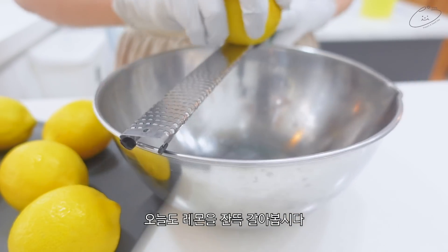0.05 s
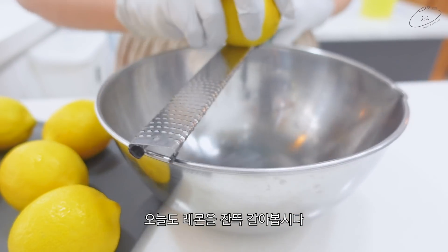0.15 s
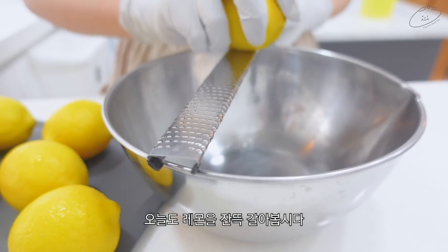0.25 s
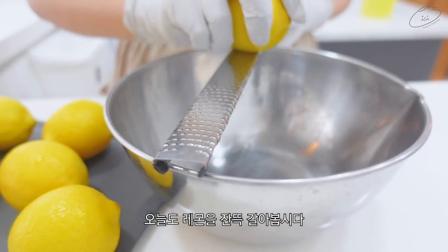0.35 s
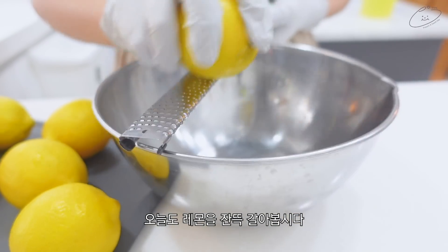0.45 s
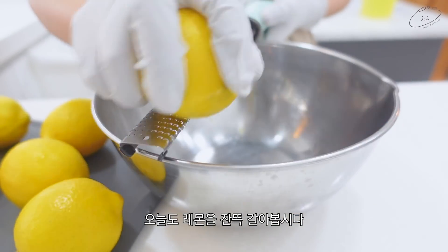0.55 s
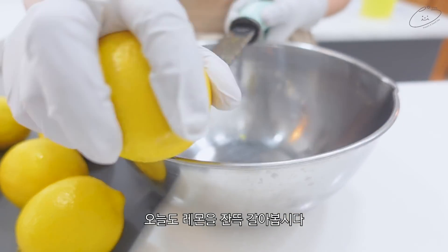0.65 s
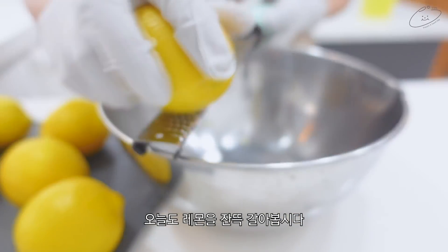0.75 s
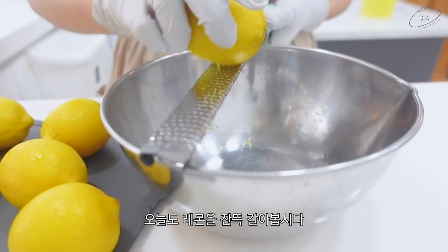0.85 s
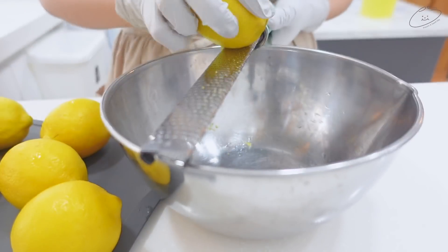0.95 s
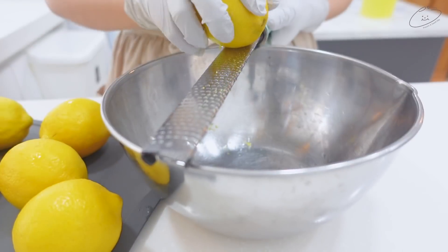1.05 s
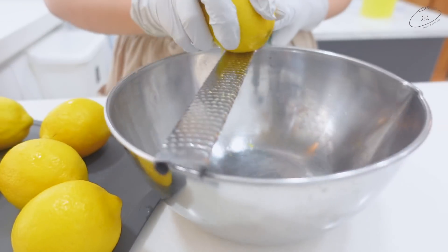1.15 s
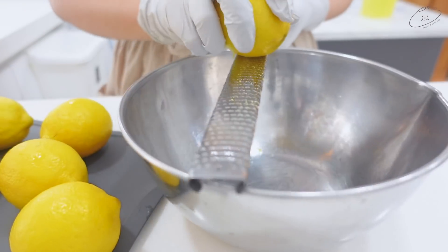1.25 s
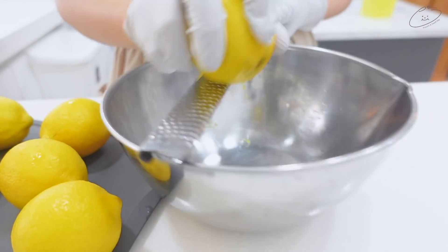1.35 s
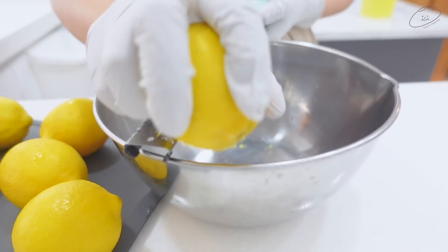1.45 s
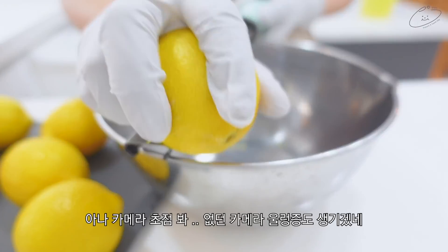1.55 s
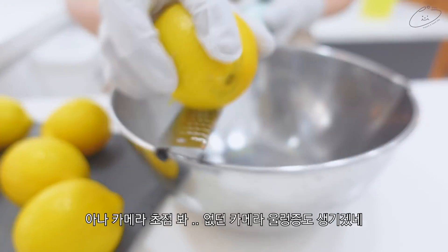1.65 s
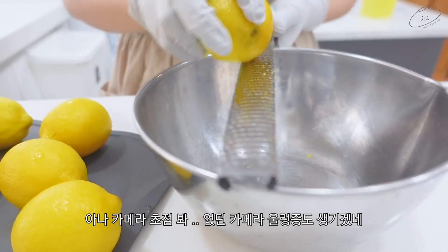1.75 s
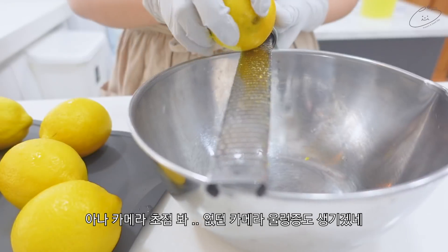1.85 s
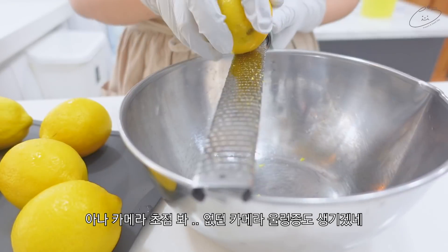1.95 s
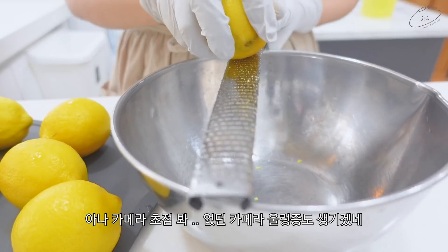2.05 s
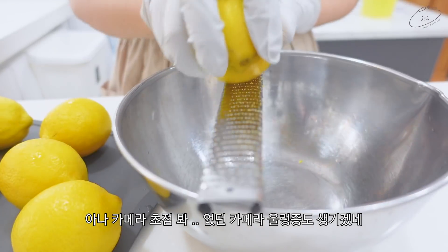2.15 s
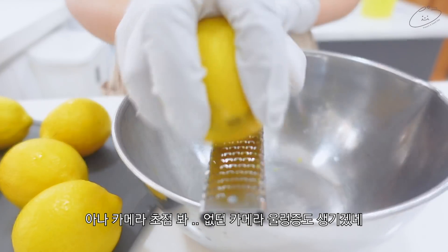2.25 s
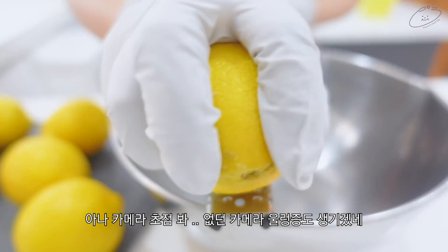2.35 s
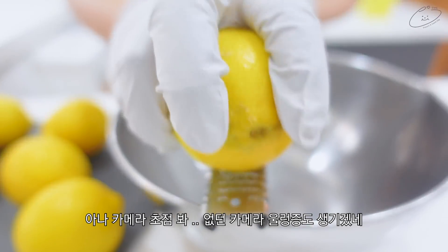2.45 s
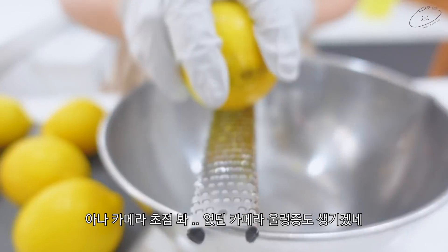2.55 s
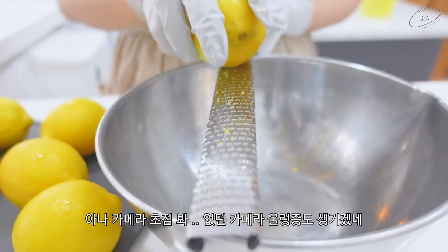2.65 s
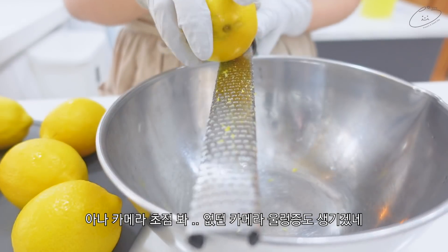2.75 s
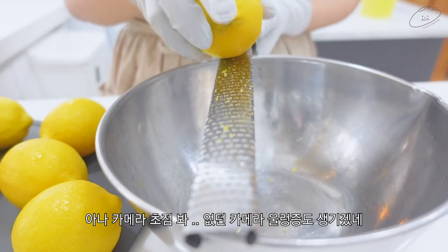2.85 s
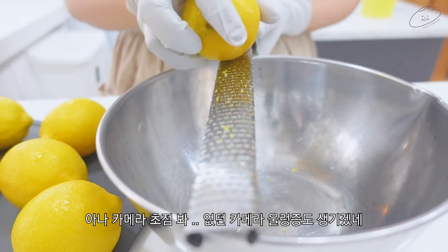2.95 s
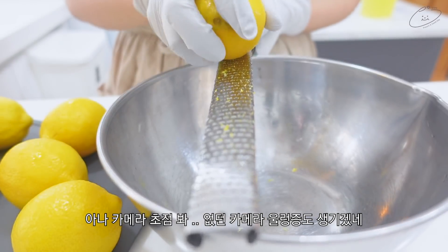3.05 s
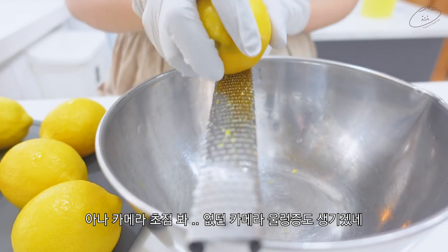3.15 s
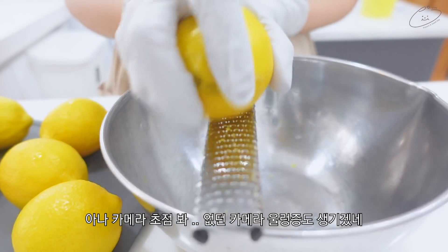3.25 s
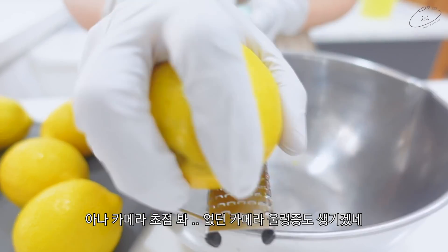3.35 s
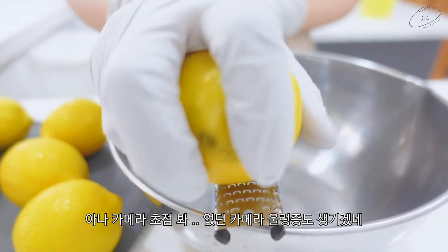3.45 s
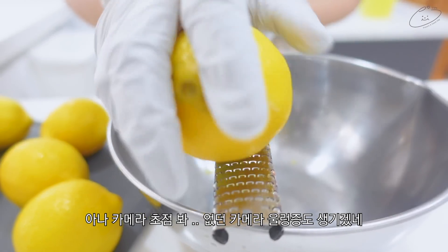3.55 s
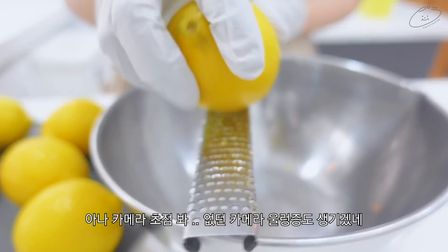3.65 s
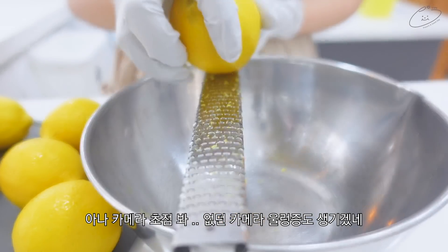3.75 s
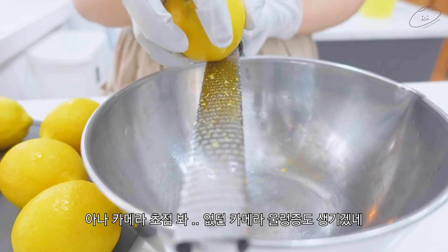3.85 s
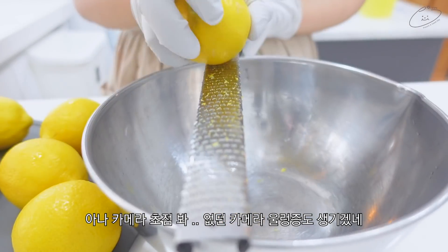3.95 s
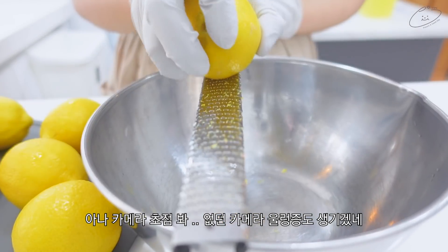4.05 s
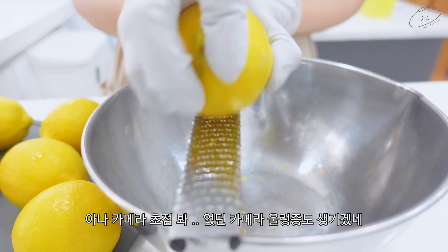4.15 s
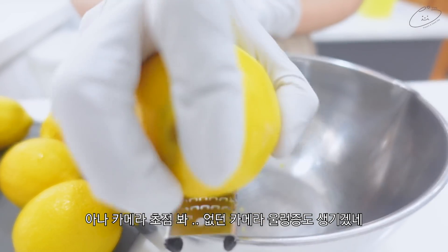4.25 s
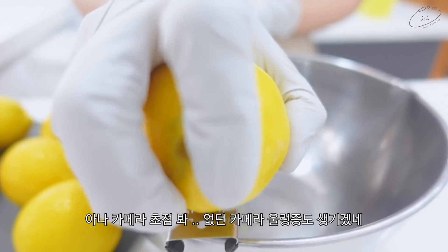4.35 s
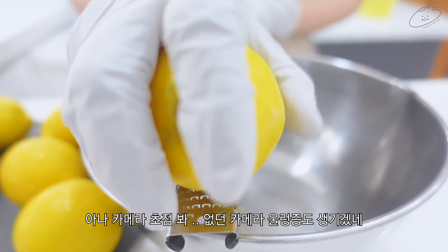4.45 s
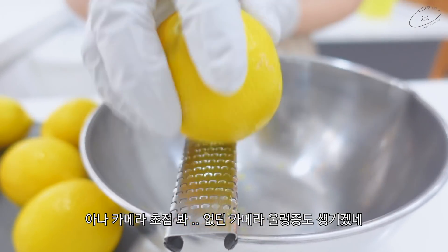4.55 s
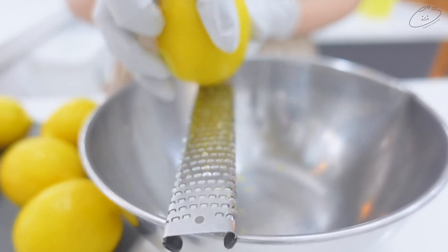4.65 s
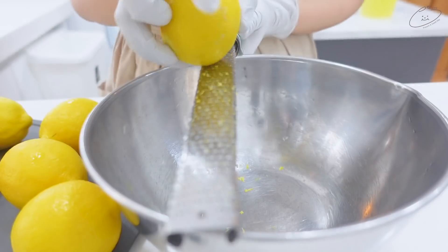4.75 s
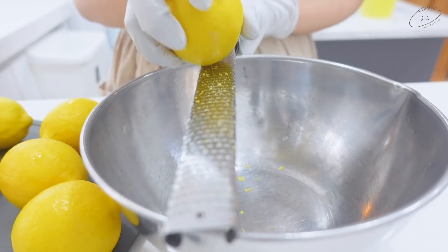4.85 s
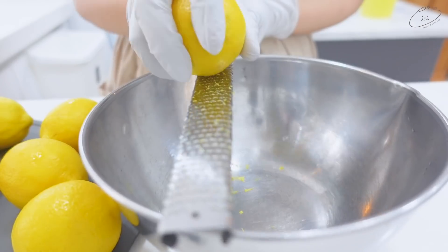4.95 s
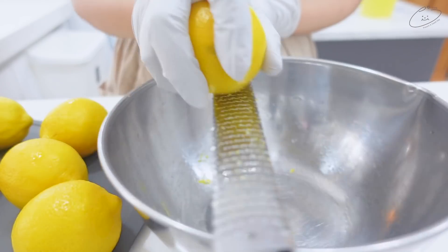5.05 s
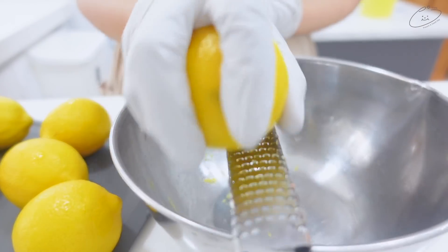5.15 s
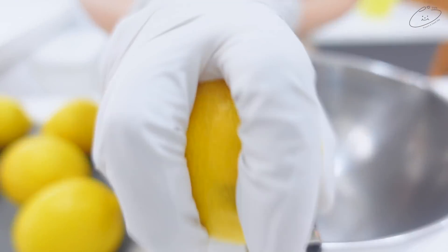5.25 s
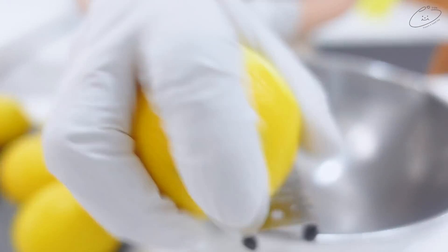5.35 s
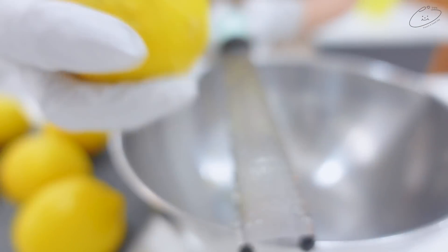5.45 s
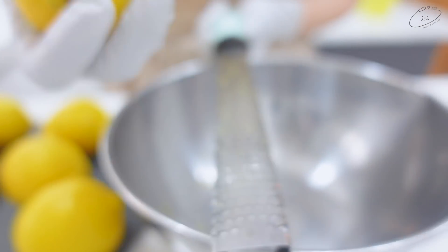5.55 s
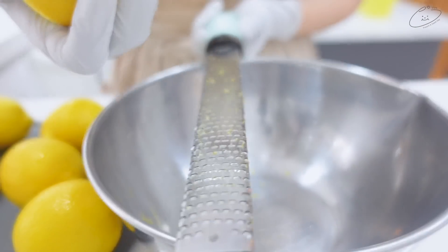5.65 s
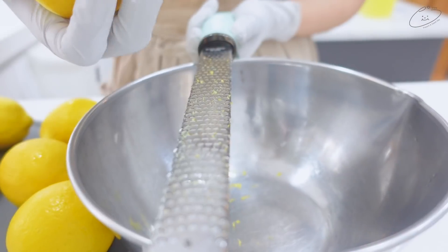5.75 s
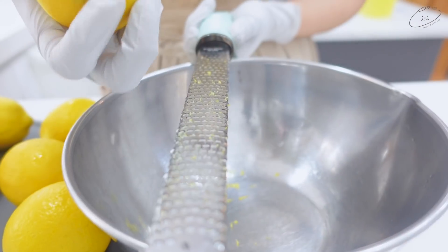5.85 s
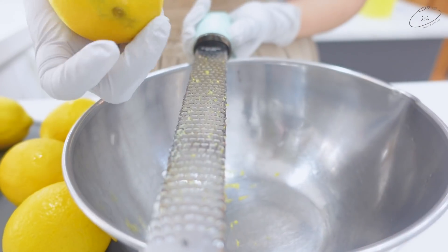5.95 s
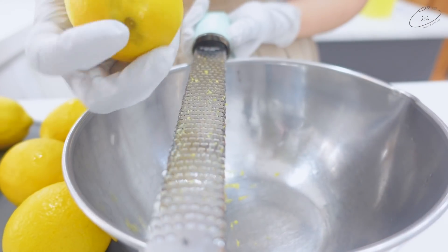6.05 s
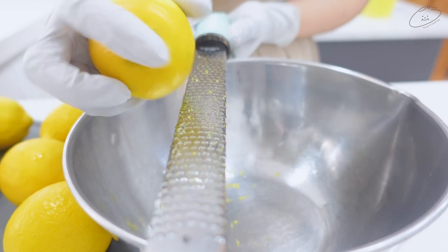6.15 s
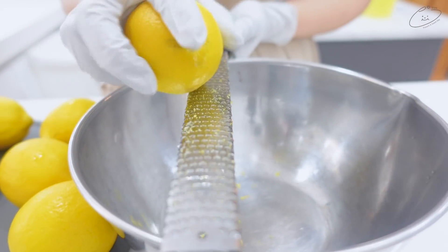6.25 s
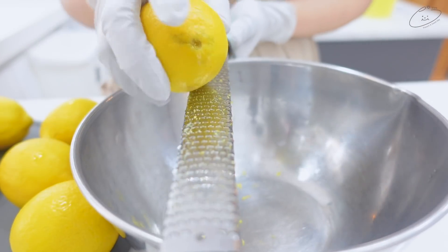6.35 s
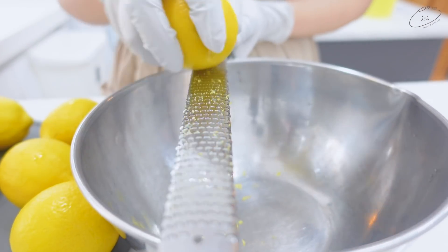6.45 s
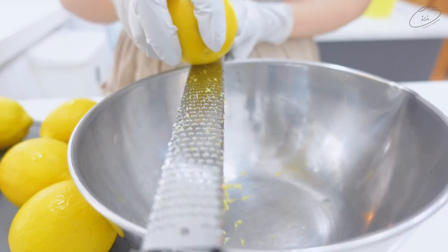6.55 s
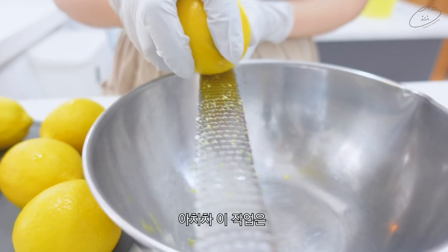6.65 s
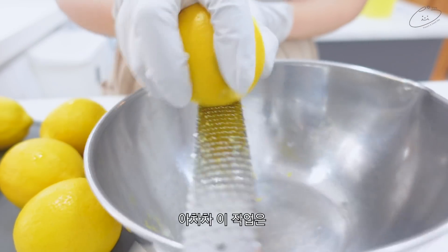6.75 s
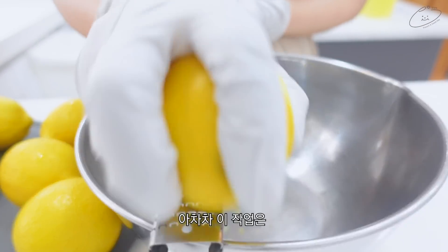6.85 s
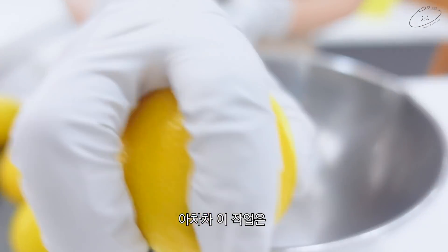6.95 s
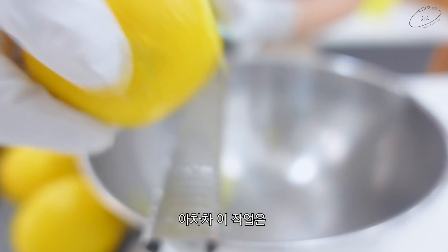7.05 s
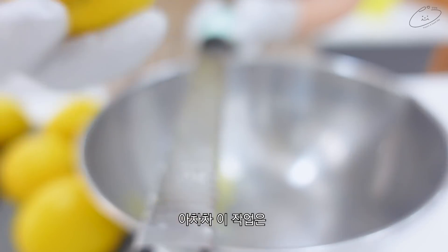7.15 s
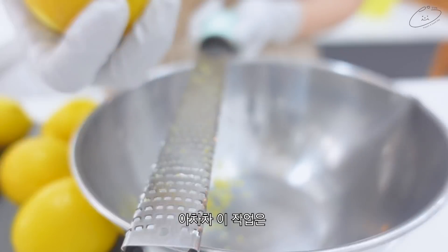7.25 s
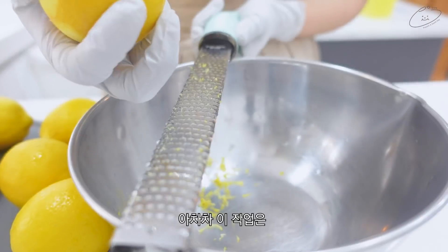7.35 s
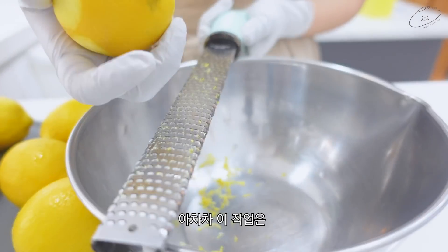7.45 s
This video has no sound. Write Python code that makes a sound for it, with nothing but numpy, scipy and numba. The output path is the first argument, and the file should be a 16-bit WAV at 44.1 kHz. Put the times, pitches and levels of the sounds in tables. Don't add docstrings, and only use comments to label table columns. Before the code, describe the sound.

Close, crisp rasping of citrus peel on a metal grater, separated by soft rustles and rim ticks over a bowl; faint low room rumble behind.

```python
import sys
import numpy as np
from scipy import signal
from scipy.fft import rfft, irfft
from scipy.io import wavfile
from scipy.ndimage import uniform_filter1d
from numba import njit

SR = 44100
rng = np.random.default_rng(int(sys.argv[2]) if len(sys.argv) > 2 else 0)


def field_ratio(decibels):
    return 10 ** (np.asarray(decibels, dtype=float) / 20)


def store_pcm(level_fs):
    pcm = np.round(np.clip(level_fs, -1, 1) * 32767).astype(np.int16)
    wavfile.write(sys.argv[1], SR, np.atleast_2d(pcm).T)


N = 330353

# (pitch [Hz], width [Hz], level [dB])
BLADE_MODES = [(1990, 120, -2), (3430, 1100, -4), (2997, 210, 1.5), (3870, 57, 8), (4440, 610, 9.5),
               (5220, 1350, 5.5), (1740, 560, -13.5), (2425, 72, -4)]
# (pitch [Hz], width [Hz], level [dB])
TEETH_MODES = [(6550, 250, 6.5), (6690, 170, 6), (7450, 1400, -6), (8250, 310, 11), (8900, 300, -3.5),
               (10230, 170, 3)]
# (centre [Hz], width [Hz], level [dB])
GLOVE_BRIGHT = [(6550, 3500, -0.5), (9280, 2800, 0.5), (11240, 5450, -1.5), (15400, 1600, -8)]
# (start [s], attack [s], hold [s], release [s], heaviest after the attack [s])
STROKES = [
    (0.429, 0.021, .24, 0.11, .0),
    (1.345, 0.022, 0.13, 0.14, 0),
    (2.125, 0.058, 0.21, 0.058, 0.012),
    (3.179, 0.046, 0.19, 0.13, 0.11),
    (4.071, 0.12, 0.13, 0.14, 0.038),
    (5.102, 0.077, 0.17, 0.074, 0.045),
    (6.747, 0.067, 0.14, 0.12, 0.065),
]


def level(x, db):
    return x * field_ratio(db) / np.sqrt(np.mean(x ** 2))


@njit
def svf(x, hz, width):
    y, band, low = np.empty(len(x)), 0., 0.
    for i in range(len(x)):
        g, k = np.tan(np.pi * hz[i] / SR), width / hz[i]
        v = (band + g * (x[i] - low)) / (1 + g * (g + k))
        band, low, y[i] = 2 * v - band, low + 2 * g * v, k * v
    return y


def band_twice(x, hz, width):
    centre = np.zeros(N) + hz
    return svf(svf(x, centre, 1. * width), centre, 1. * width)


def walk(rate):
    k = int(SR / rate)
    held = np.repeat(rng.standard_normal(4000)[:N // k + 1], k)
    return 1.3 * uniform_filter1d(uniform_filter1d(held, k), k)[:N]


def ring(x, modes, drift=0., vary_db=0., flip=-1, ratio=0.98, feed_db=()):
    x = np.atleast_2d(x)
    shares = field_ratio(np.transpose(modes)[2])
    feed_db = [*feed_db, *np.zeros(len(modes))]
    out = 0
    for k, (hz, width, _) in enumerate(modes):
        drive = x[k % len(x)] * field_ratio(feed_db[k] + vary_db * walk(25)) + 1e-18
        moving_hz = hz * ratio * (1 + drift * walk(6))
        out = out + flip ** k * shares[k] / np.sqrt(width) * svf(drive, moving_hz, 1. * width)
    return out / np.sqrt(np.pi / SR * np.sum(shares ** 2))


def curve(table):
    s, *columns = np.transpose(table)
    return [np.interp(np.arange(N) / SR, s, c) for c in columns]


def grit(scatter_db, catch_db, rate):
    uneven = np.minimum(rng.exponential(size=N), 4)
    sizes = field_ratio(scatter_db * uneven + catch_db * walk(rate))
    return level(rng.standard_normal(N) * sizes, 0)


def tone(table, wobble):
    first, last = table[0], table[-1]
    hz, db = curve([(first[0] - .05, first[1], -120), *table, (last[0] + .05, last[1], -120)])
    turn = 2 * np.pi * np.cumsum(hz * (1 + wobble * walk(68))) / SR
    return np.sqrt(2) * field_ratio(db) * np.sin(turn)


def milliseconds():
    return np.arange(N * 1000 // SR + 1)


def per_sample(slow):
    return np.interp(np.arange(N) / SR, np.arange(len(slow)) / 1000, slow)


def swells(peak_s, rise_s, fall_s, db):
    late = milliseconds() / 1000 - peak_s[:, None]
    fade_db = 17 * np.maximum(late / fall_s[:, None], -late / rise_s[:, None])
    return db[:, None] - fade_db


def kitchen():
    # (pitch [Hz], level [dB per Hz])
    colour = [(18, -57), (30, -27), (95, -1.5), (174, 5.5), (319, -13), (486, -26), (684, -15), (1910, -26),
              (4080, -32.5), (4420, -35), (6720, -34), (14800, -39.5), (16000, -39)]
    hz, db = np.transpose(colour)
    log_hz = np.log(np.fft.rfftfreq(N, 1 / SR) + 1)
    wide_db = np.interp(log_hz, np.log([200, 400, 4400, 8000]), [-22.5, -3.5, -7.5, -13.0])
    mid_db = np.interp(log_hz, np.log(hz), db)
    spectra = rfft(rng.standard_normal((2, N))) * field_ratio(mid_db + [0 * wide_db, wide_db])
    mid, side = irfft(spectra, N)
    breathing = field_ratio(0.22 * walk(0.35))
    return level((mid + side * np.array([[1], [-1]])) * breathing, -42.5)


def road():
    pass_s, width_s = 2.7, 2.3
    rumble = band_twice(rng.standard_normal(N), 160, 120)
    return level(rumble, -58) * np.exp(-((np.arange(N) / SR - pass_s) / width_s) ** 2)


def contact():
    # (tearing [dB], lost 0.1 s off the peak [dB],
    # hiss, bowl and table against tearing [dB, dB, dB])
    force = [(-28.5, -0.26, 0.26, -1, -3), (-25, 1, 2, 1, -7.5), (-28.5, -1.5, 1.6, 0.5, -9),
             (-27, 3, 3.5, 1.5, -10), (-25.5, 3.5, 3.2, 5, -8), (-23.5, 4.5, 1.5, -2, -7.5),
             (-22, 4, 2.5, 3.5, -8.5)]
    # (peak [s], rise [s], fall [s], hiss [dB],
    # bowl against hiss [dB])
    brushes = [(.07, 0.39, 0.52, -51.5, -2.5), (.24, 0.048, 0.053, -50.5, 1),
               (.285, 0.028, 0.026, -48.5, 6.5), (.8, 0.11, 0.23, -44, -3), (.905, 0.052, 0.33, -49, 0),
               (.945, 0.12, 0.039, -40.5, 4), (1.297, 0.51, 0.049, -52.5, 4.5), (1.68, 0.14, 0.13, -53, 2),
               (1.8, 0.23, 0.12, -39, 0.5), (1.956, 0.13, 0.24, -47, -2.5), (2.1, 0.067, .08, -54, 5),
               (2.514, 0.11, 0.053, -46, -1), (2.625, 0.11, 0.25, -39.5, 1),
               (2.725, 0.14, 0.038, -41.5, -4), (3.69, 0.063, 0.28, -41, -32),
               (3.775, 0.18, 0.12, -47.5, 3), (4.44, 0.13, 0.048, -63.5, 18.5),
               (4.674, 0.11, 0.28, -43, -1), (5.0, 0.75, .1, -44.5, -5), (5.085, 0.059, 0.045, -49.5, 10),
               (5.43, 0.15, 0.17, -49, -0.5), (5.557, 0.31, 0.13, -45, -11), (6.48, 0.39, 0.12, -45, -16),
               (6.55, 0.13, 0.075, -49, 3),
               (6.712, 0.044, 0.029, -36.5, 0.5),
        (6.911, 0.01, .007, -21, -4),
        (7.033, 0.053, 0.051, -56, 22),
    ]
    # (peak [s], rise [s], fall [s], hiss [dB])
    rustles = [(1.073, 0.38, 0.12, -45.5), (2.968, 0.59, 0.13, -44.5), (3.078, 0.056, 0.049, -43),
               (3.572, 0.065, 0.22, -40), (3.966, 0.2, 0.071, -43), (4.585, 0.22, 0.066, -41),
               (5.847, 0.065, 0.057, -50), (5.98, 0.16, 0.085, -49.5), (6.166, 0.088, 0.061, -45),
               (6.275, 0.052, .05, -46), (6.358, 0.068, 0.029, -44), (7.159, 0.095, 0.1, -41.5),
               (7.3, 0.068, 0.29, -50.5)]
    peak_shares = (1.01, 1.2, 1.6, 2.1)
    # (tearing, hiss, bowl, table) [dB]
    slowing_loss = (0.5, 5, 6, -12.5)
    # (tearing, hiss, bowl, table) [dB]
    rest_levels = (-111, -81, -82, -56)

    start, attack, hold, release, peak = np.transpose(STROKES)[:, :, None]
    tear_db, off_peak_db, *others_db = np.transpose(force)[:, :, None]
    age = milliseconds() / 1000 - start - attack
    stroke = tear_db - 18.5 * np.maximum(-age / attack, 0) ** 1.71
    stroke = stroke - 34 * np.maximum((age - hold) / release, 0)
    off = 10 * np.abs(np.clip(age, 0, hold) - peak)
    slowing = np.clip(age / hold, 0, 1) ** 4.3
    strokes = []
    for db, share, slow_db in zip([0, *others_db], peak_shares, slowing_loss):
        strokes.append(stroke + db - share * off_peak_db * off - slow_db * slowing)
    strokes[-1] = strokes[-1] - 5.5 * off ** 2

    glove_bowl_db = -11.5
    light = [*brushes, *[(*row, glove_bowl_db) for row in rustles]]
    *shape, bowl = np.transpose(light)
    touch, bowl = swells(*shape), bowl[:, None]
    touches = touch - 2 + 0.6 * bowl, touch, touch + bowl, touch + 0.92 * bowl - 7
    levels = []
    for a, b, rest in zip(strokes, touches, rest_levels):
        power = np.sum(field_ratio(2 * a), axis=0) + np.sum(field_ratio(2 * b), axis=0) + field_ratio(2 * rest)
        levels.append(per_sample(10 * np.log10(power)))
    return levels


def load():
    # (bowl pitch at start [ratio], at end [ratio], upper modes [dB], blade pitch [ratio])
    loads = [(1.054, 1.094, -10, 0.93), (1.004, 1.06, -6.5, 1.02), (1.01, 0.98, -6.5, 0.99),
             (0.94, 1, -2, 1.01), (1, 0.97, -7, .99), (1.106, 0.946, -5.5, 0.98), (0.97, 1.034, -9, 0.972)]
    rows = []
    for (s, attack, hold, _, _), (first, last, *rest) in zip(STROKES, loads):
        rows += [(s, first, *rest), (s + attack + hold, last, *rest)]
    return curve(rows)


def bearing():
    feeds = [(-2, 8, -5, -6, 0.5), (-2, 8, -1.8, -4, -3), (4.5, 8.5, -0.5, -7.5, 1.8),
             (6, -15, -6, -3, 2.5), (4.5, 8, 2.5, -2, 3.5), (6.5, 13.5, 1.5, -4, 1),
             (6.5, -3, 4.5, -2.5, 0)]
    # (first mode [dB], fourth mode [dB])
    travel = [(0, 0), (-3, -5), (6, 0), (6, -3), (9, -2), (4, -14), (13, -3)]
    rows = []
    for (s, attack, hold, _, _), feed, (first, fourth) in zip(STROKES, feeds, travel):
        change = np.array([first, 0, 0, fourth, 0])
        rows += [(s, *(feed - .5 * change)), (s + attack + hold, *(feed + .5 * change))]
    return curve(rows)


def grips():
    # (time [s], gain [dB])
    moments = [(0.466, -2.5), (0.499, 1), (0.526, 2), (0.535, 0), (0.559, -1.3), (0.601, -2), (0.618, 4.5),
               (0.637, 3.5), (0.654, 1.5), (0.673, 2), (0.688, 3), (0.699, -5), (1.402, 2.5), (1.429, 0),
               (1.478, 0), (1.516, 2), (2.221, 0), (2.25, 4), (2.338, 0), (2.392, 1), (2.411, 3),
               (3.212, -3.5), (3.228, -4), (3.285, 2), (3.313, 3), (3.339, -4), (4.211, 2.5), (4.355, -2.5),
               (5.132, -5.5), (5.169, 0.5), (5.191, 0), (5.198, -4), (5.337, -1), (6.896, 4), (6.913, 5.5),
               (6.922, -5), (6.944, -3), (6.982, 4)]
    s, db = np.transpose(moments)[:, :, None]
    width_ms = 5.3
    bumps = db * np.exp(-((milliseconds() - 1000 * s) / width_ms) ** 2)
    return per_sample(0.73 * np.sum(bumps, axis=0))


def rasp():
    # (pitch [Hz], width [Hz], level [dB])
    table_modes = [(284.7, 20, 0), (345, 36, 3), (426, 167, 0.5)]
    # (pitch [Hz], width [Hz], level [dB])
    bowl_modes = [(556, 77, -5), (638, 67, 0.5), (727, 125, -6)]
    # (pitch [Hz], width [Hz], level [dB])
    upper_modes = [(814, 290, -4), (1248, 86, -1.5), (1384, 110, 0)]
    # (centre [Hz], width [Hz], level [dB])
    glove_dark = [(2300, 5700, -0.58), (4760, 2600, 1.1)]

    tear_db, hiss_db, bowl_db, push_db = contact()
    pressed = np.clip((tear_db + 49.5) / 14, 0, 1)
    jitter_db = 0.49 * walk(40) + 0.75 * walk(220) + (1 - pressed) * 2.37 * walk(110)
    catches = field_ratio(grips() + jitter_db)
    out = ring(field_ratio(push_db) * grit(0.29, 2.5, 60), table_modes)

    shake = field_ratio(bowl_db - 1) * catches * grit(2.2, 0.93, 120)
    ratio, upper_db, blade_ratio = load()
    out += ring(field_ratio(-2.5 * pressed) * shake, bowl_modes, drift=0.0074, vary_db=1.5, ratio=ratio)
    out += ring(field_ratio(upper_db - 2 * (1 - pressed)) * shake, upper_modes, drift=0.0056, vary_db=0.5)

    tearing = tear_db, BLADE_MODES, glove_dark, .75, bearing()
    hissing = hiss_db, TEETH_MODES, GLOVE_BRIGHT, .3, ()
    for db, modes, rustle, share, feed_db in (tearing, hissing):
        steel = share * pressed
        force = field_ratio(db) * catches
        rows = [steel * force * grit(0.66, 1.5, 300) for _ in range(3)]
        out += ring(rows, modes, drift=0.0064, vary_db=2.0, ratio=blade_ratio, feed_db=feed_db)
        out += ring(np.sqrt(1 - steel ** 2) * force * grit(4.3, 0.26, 300), rustle, vary_db=0.23)
    return out


def snaps():
    # (time [s], level [dB], centre [Hz])
    clicks = [(0.011, -38.5, 3900), (0.158, -36, 4470), (0.885, -29, 5240), (0.9792, -41, 7500),
              (1.0001, -41, 4440), (1.104, -38, 8060), (1.1679, -39.5, 7950), (1.2186, -40, 4940),
              (2.0393, -45, 6790), (2.5052, -42, 6260), (2.796, -36, 9750), (2.84, -48, 5000),
              (2.922, -44, 6120), (3.56, -43, 6790), (3.6363, -32, 8820), (3.6564, -42, 4970),
              (3.6693, -39, 8330), (3.961, -39, 4270), (4.5735, -46, 6570), (5.0344, -41, 6700),
              (5.0494, -43, 6200), (5.573, -42, 9310), (5.6107, -42, 9450), (5.8417, -37, 7100),
              (5.995, -44, 12000), (6.572, -43, 3000), (6.487, -45, 8000), (5.103, -38, 6000),
              (5.072, -44, 5000), (6.1356, -41, 6350), (6.19, -52, 5880), (6.351, -33, 8000),
              (6.433, -50, 4720), (6.4579, -43, 5640), (6.556, -40, 7880), (6.894, -15, 3870),
              (7.003, -20.5, 9350), (7.163, -33, 12900)]
    out, centre, t = np.zeros(N), np.full(N, 8000.), np.arange(800) / SR
    decay_ms = 1
    for s, db, hz in sorted(clicks):
        at = int(s * SR)
        out[at:at + len(t)] += field_ratio(db) * rng.standard_normal(len(t)) * np.exp(-1000 * t / decay_ms)
        centre[at:] = hz
    return field_ratio(9.5) * svf(svf(out, centre, 5300.0), centre, 7200.0)


def slide():
    # (peak [s], rise [s], fall [s], level [dB], centre [Hz])
    slips = [
        (.12, .25, 0.06, -60, 6900),
        (0.229, .02, .25, -57, 6900),
        (1.28, 0.066, 0.059, -48.5, 6900),
        (5.87, 0.27, 0.14, -61, 7100),
        (6.16, 0.03, 0.05, -53, 5700),
        (1.72, 0.044, 0.016, -44, 3200),
        (1.55, .05, 0.028, -38, 3560),
    ]
    *shape, centre_hz = np.transpose(slips)
    db = swells(*shape)
    hz = per_sample(centre_hz[np.argmax(db, axis=0)])
    air = band_twice(grit(1.1, 1.5, 84), hz, 1300)
    return field_ratio(per_sample(np.max(db, axis=0))) * level(air, 0)


def taps():
    # (time [s], tick [dB], bowl [dB], blade [dB])
    hits = [(0.4344, -30, -40, -22), (0.9024, -46, -52, -52), (1.353, -28, -52, -22),
            (1.7818, -22.5, -28, -42), (2.0703, -22, -29.5, -24), (2.1314, -38, -47, -33),
            (2.154, -25, -31, -28), (2.603, -25.5, -27.5, -40), (2.6239, -25, -37, -46),
            (2.7345, -29.5, -32, -34), (3.0086, -29.5, -34.5, -33), (3.1571, -24, -30.5, -26),
            (3.6837, -46, -37.5, -53), (4.0701, -31, -41, -29), (4.6207, -24, -28.5, -28),
            (4.6866, -20, -22.5, -21.5), (4.7194, -43, -41, -45), (4.7448, -18, -21.5, -21),
            (4.782, -9, -13, -6), (4.9836, -19, -23.5, -20), (5.0714, -42, -38.5, -28),
            (5.1045, -31, -33.5, -14), (5.1879, -24, -27, -5), (5.5458, -44, -57, -53),
            (6.2678, -52, -37.5, -54), (6.5844, -33, -44, -37), (6.6927, -54, -55, -55),
            (6.7655, -44, -42, -32), (6.9075, -30, -19, -23), (7.0294, -39, -33, -53)]
    upper_levels = [-4, 0, -3, -4, 3, 0, 0, 0, 0, -9, 0, 7, 0, 4, -5, -5, -16, -1, 3.5, -1, 0, 0, 0, 9, -7,
                    4, 3, 0, 4, 0]
    # (pitch [Hz], width [Hz], level [dB])
    rim_modes = [(690, 42, 3.5), (797, 89, 3.5), (1323, 49, 7.5), (1810, 61, -5), (884, 76, 0),
                 (2790, 73, 5.5), (3740, 160, 4), (1370, 110, -13), (2370, 170, 9)]

    tick, blade, bowl = np.zeros(N), np.zeros(N), np.zeros(N)
    t = np.arange(4000) / SR
    chatter_ms = 3.17
    age = 1000 * t / chatter_ms
    knock = 0
    for lag_s, size in ((.0006, -0.26), (.0028, 1), (.0045, .4)):
        knock = knock + size * np.exp(-((t - lag_s) / .0001) ** 2)
    tick_shape = (1 - np.exp(-age / 0.18)) * (np.exp(-age) + 0.35 * np.exp(-age / 6))
    rattle_shape = 0.35 * (1 - np.exp(-age / 0.3)) * np.exp(-age / 2.8)
    for s, tick_db, bowl_db, blade_db in hits:
        at = slice(int(s * SR), int(s * SR) + len(t))
        bright_noise, dull_noise = rng.standard_normal((2, len(t)))
        tick[at] += field_ratio(tick_db) * bright_noise * tick_shape
        blade[at] += field_ratio(blade_db) * dull_noise * np.exp(-age / 1.4)
        bowl[at] += field_ratio(bowl_db) * (knock + dull_noise * rattle_shape)

    latest = np.searchsorted(np.transpose(hits)[0], np.arange(N) / SR) - 1
    upper_db = np.asarray(upper_levels)[np.maximum(latest, 0)]
    bowl = signal.sosfilt(signal.butter(2, 560, "highpass", fs=SR, output="sos"), bowl)
    tick = signal.sosfilt(signal.butter(4, 5600, "highpass", fs=SR, output="sos"), tick)
    out = field_ratio(-1.0) * svf(tick, np.full(N, 8200.), 5400.0)
    out += field_ratio(-4.5) * ring(tick, TEETH_MODES) + field_ratio(-19.0) * ring(tick, GLOVE_BRIGHT)
    out += field_ratio(-13.5) * ring(blade, BLADE_MODES)
    return out + field_ratio(10.0) * ring(bowl, rim_modes, flip=0.72, ratio=0.99, feed_db=(0, 0, upper_db))


def bites():
    # (time [s], peak [dB], pitch [Hz])
    low_bites = [(0.444, -24, 736), (0.484, -21, 688), (0.541, -28, 715), (0.565, -26, 662),
                 (0.599, -27, 712), (0.638, -19.5, 636), (0.684, -35, 668), (0.876, -37, 705),
                 (0.924, -49, 750), (0.941, -44, 770), (1.034, -38.5, 600), (1.348, -41, 690),
                 (1.366, -23, 626), (1.413, -20, 694), (1.436, -19, 690), (1.474, -23.5, 643),
                 (1.706, -40, 660), (1.758, -38, 668), (1.785, -37, 700), (1.806, -25, 675),
                 (1.856, -43, 660), (2.173, -23.5, 663), (2.191, -21.5, 658), (2.219, -31, 643),
                 (2.268, -21.5, 583), (2.309, -26, 581), (2.359, -39, 617), (2.625, -32.5, 727),
                 (2.664, -32, 710), (2.706, -32, 637), (3.229, -25, 568), (3.26, -27, 657),
                 (3.295, -31, 566), (3.335, -21, 653), (3.391, -23, 659), (4.124, -26, 650),
                 (4.164, -31, 640), (4.203, -17.5, 654), (4.234, -22, 706), (4.291, -24, 664),
                 (4.723, -29, 690), (4.729, -31, 710), (4.752, -31, 690), (4.771, -33, 680),
                 (5.146, -19, 639), (5.188, -18.5, 637), (5.231, -17.5, 644), (5.279, -26, 617),
                 (5.534, -39, 603), (6.712, -32, 651), (6.765, -26.5, 680), (6.797, -33, 680),
                 (6.817, -18, 680), (6.832, -26, 662), (6.85, -16.5, 626), (6.868, -13, 666),
                 (6.944, -25, 565), (7.027, -26, 658)]
    # (time [s], peak [dB], pitch [Hz])
    high_bites = [(1.38, -33, 1350), (1.45, -29, 1310), (1.491, -36, 1323), (1.525, -37, 1310),
                  (2.27, -25, 1990), (2.338, -33, 1970), (2.355, -23, 1990), (2.375, -33, 1990),
                  (2.63, -36, 1330), (2.655, -38, 1316), (2.68, -38, 1315), (3.3, -23, 1330),
                  (3.325, -31, 1370), (4.225, -31, 1990), (5.33, -34, 1990), (6.81, -27, 1328),
                  (6.915, -21, 1930), (6.935, -25, 1380), (6.95, -29, 1950), (6.985, -33, 1967),
                  (7.034, -36, 1310)]
    out, t = np.zeros(N), np.arange(4000) / SR
    rise_ms, fall_ms, lead_ms = 5.4, 14.1, 3.03
    shape = (1 - np.exp(-1000 * t / rise_ms)) * np.exp(-1000 * t / fall_ms)
    waver = 1 + 0.032 * walk(150)
    for s, db, hz in [*low_bites, *high_bites]:
        start = int((s - lead_ms / 1000) * SR)
        at = slice(start, start + len(t))
        turn = 2 * np.pi * np.cumsum(waver[at]) / SR
        out[at] += field_ratio(db + 2.5) * shape * (np.sin(hz * turn) + field_ratio(-16.5) * np.sin(1342 * turn))
    return out


def jolts():
    # (time [s], level [dB], pitch [Hz], thump [dB], decay [ms])
    knocks = [
        (.4565, -9, 714, -32, 2.8),
        (.5012, 6, 846, -27, 1.66),
        (.9035, -16, 610, -32, 2.5),
        (1.3655, -8, 640, -23, 3.2),
        (5.553, -32.5, 623, -60, 7.6),
        (6.266, -30.5, 600, -57, 5.5),
        (6.584, -20, 620, -58, 3),
        (6.706, -33, 647, -58, 26),
        (6.8964, 5, 635, -21, 2.8),
        (6.9205, 9.5, 570, -19, 1.2),
    ]
    out, t = np.zeros(N), np.arange(6000) / SR
    soft_hz, hard_hz = 565, 860
    thump = np.sin(2 * np.pi * 140 * t * (1 - 0.9 * t)) * np.exp(-t / 0.0032) * (1 - np.exp(-t / 0.0021))
    for s, db, hz, thump_db, decay_ms in knocks:
        hard = np.clip((hz - soft_hz) / (hard_hz - soft_hz), .1, 1)
        turn = 2 * np.pi * hz * t
        body = np.sin(turn) + hard * (0.53 * np.sin(1.5 * turn) + 0.38 * np.sin(2.51 * turn))
        body = body * np.exp(-1000 * t / decay_ms) * (1 - np.exp(-t / 0.0022))
        at = int(s * SR)
        out[at:at + len(t)] += field_ratio(db) * body + field_ratio(thump_db + 13.5) * thump
    return signal.sosfilt(signal.butter(2, 85, "highpass", fs=SR, output="sos"), out)


def engine():
    # (time [s], pitch [Hz], level [dB])
    high_swells = [
        [(0.9, 110.4, -48), (1.018, 124.4, -43), (1.152, 118, -55), (1.216, 116.7, -39.5),
         (1.442, 110.7, -35.5), (1.57, 110, -39), (1.63, 104.3, -56)],
        [(1.66, 106, -70), (1.726, 108.9, -42), (2.176, 105, -36), (2.43, 103, -42.5), (2.54, 99.6, -54)],
    ]
    # (time [s], pitch [Hz], level [dB])
    low_swell = [(1.05, 89, -51), (1.4, 82.7, -49), (2.19, 80, -57), (2.88, 77, -70)]
    return sum(tone(swell, 0.0089) * field_ratio(walk(10)) for swell in [*high_swells, low_swell])


def glove_squeak():
    # (time [s], pitch [Hz], level [dB])
    squeak = [(5.64, 6600, -70), (5.66, 6600, -58), (5.8, 6650, -68), (5.95, 6670, -68), (6.0, 6560, -75)]
    return tone(squeak, 0.0089) * field_ratio(3.8 * walk(70))


def graze():
    # (peak [s], rise [s], fall [s], level [dB])
    scrapes = [
        (6.7, .012, .05, -47),
        (6.716, .02, 0.057, -45),
    ]
    # (pitch [Hz], width [Hz], level [dB])
    woken_modes = [(2830, 160, -7), (3960, 90, -2), (4520, 200, -6), (3170, 400, -2)]
    db = per_sample(np.max(swells(*np.transpose(scrapes)), axis=0))
    return ring(field_ratio(db) * grit(1.5, 1.5, 200), woken_modes, vary_db=7.0, ratio=0.95)


def room(x):
    # (centre [Hz], width [Hz], level [dB])
    side_bands = [(330, 190, -14), (680, 340, -25), (1280, 330, -36), (4700, 1000, -25), (2200, 1200, -59),
                  (8900, 15000, -14.5)]
    t60_s, wall_lag_ms = 0.25, 1.7
    t = np.arange(SR // 2) / SR
    tail = rng.standard_normal((2, len(t))) * np.exp(-np.log(1000) * t / t60_s) * (t > .002)
    tail /= np.sqrt(np.sum(tail ** 2, axis=1, keepdims=True))
    sideways = sum(field_ratio(db) * band_twice(x, hz, 1.6 * width) for hz, width, db in side_bands)
    mid, side = signal.fftconvolve([field_ratio(-11) * x, sideways], tail, axes=1)[:, :N]
    wall = np.roll(sideways, int(wall_lag_ms * SR / 1000))
    return mid + (field_ratio(-3.5) * side - field_ratio(-4.5) * wall) * np.array([[1], [-1]])


def scene():
    work = rasp() + snaps() + slide() + taps() + bites() + jolts() + glove_squeak() + graze()
    pan_db = 0.2 * np.array([[-1], [1]]) / 2
    return work * field_ratio(pan_db) + room(work) + kitchen() + road() + engine()


def band_limit(x):
    return signal.sosfilt(signal.butter(12, 16810, fs=SR, output="sos"), x)


def record(dry):
    top = signal.ellip(6, .5, 24, 15900, fs=SR, output="sos")
    bass = signal.butter(3, 55, "highpass", fs=SR, output="sos")
    mix = signal.sosfilt(np.vstack([bass, top]), dry)
    return band_limit(mix)


dry = scene()
out = record(dry)
store_pcm(out)
```